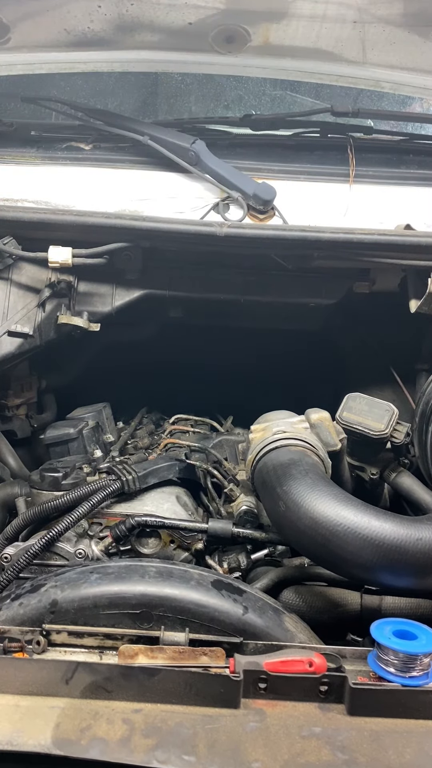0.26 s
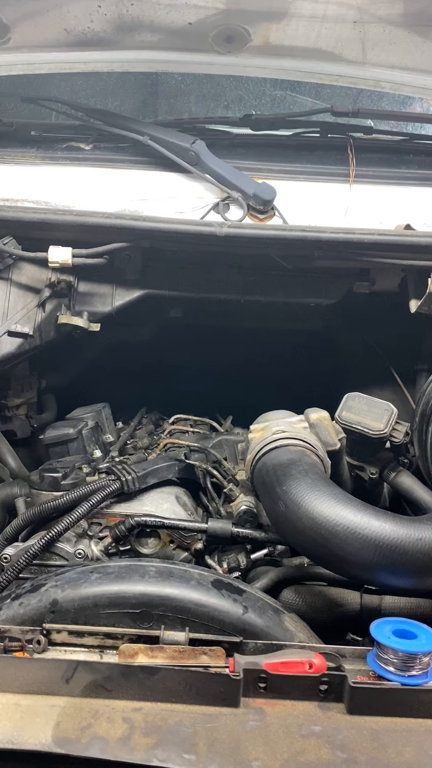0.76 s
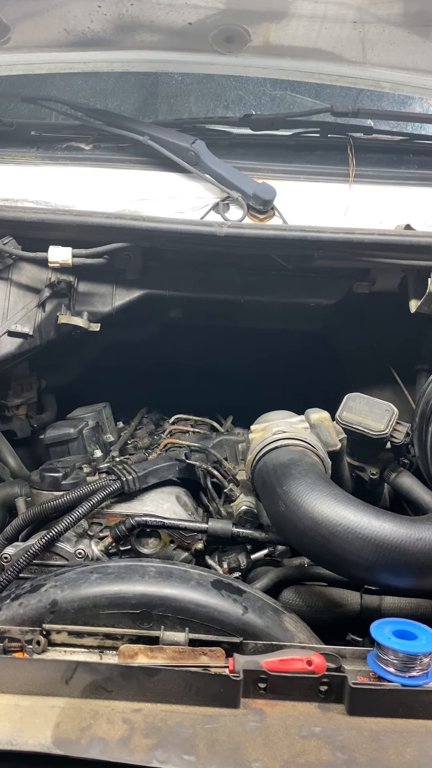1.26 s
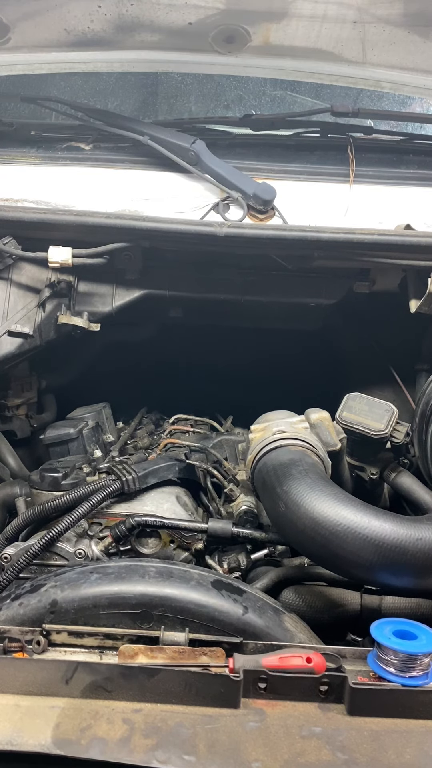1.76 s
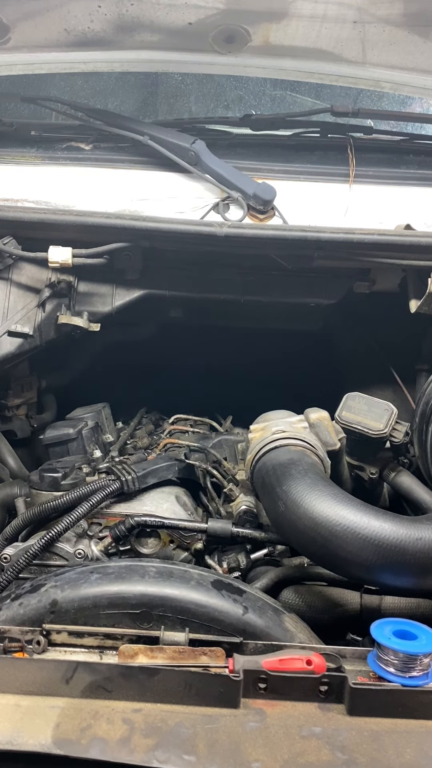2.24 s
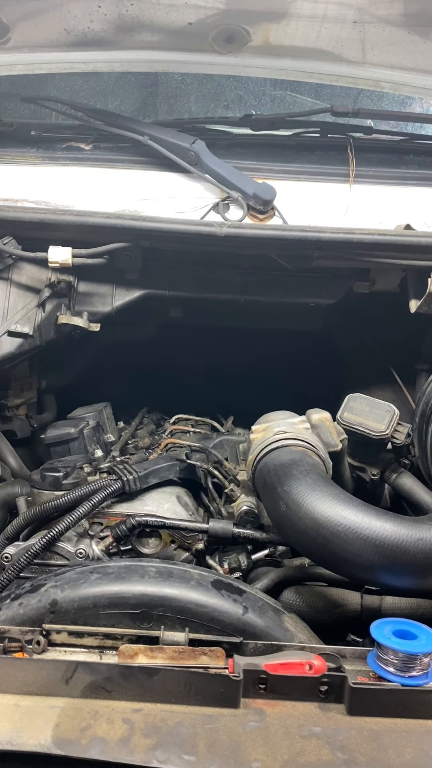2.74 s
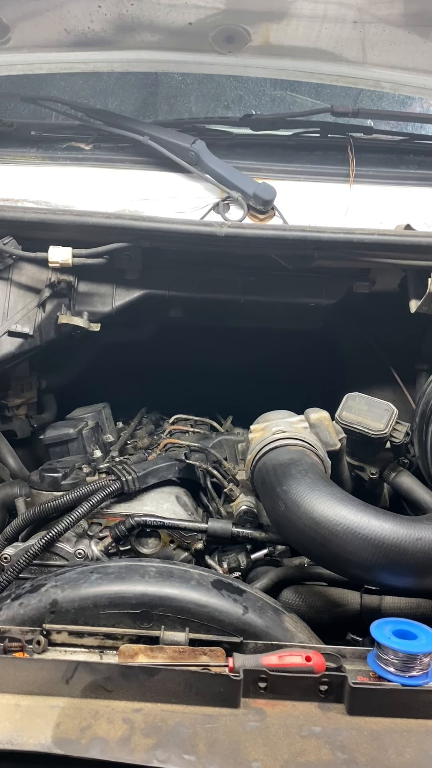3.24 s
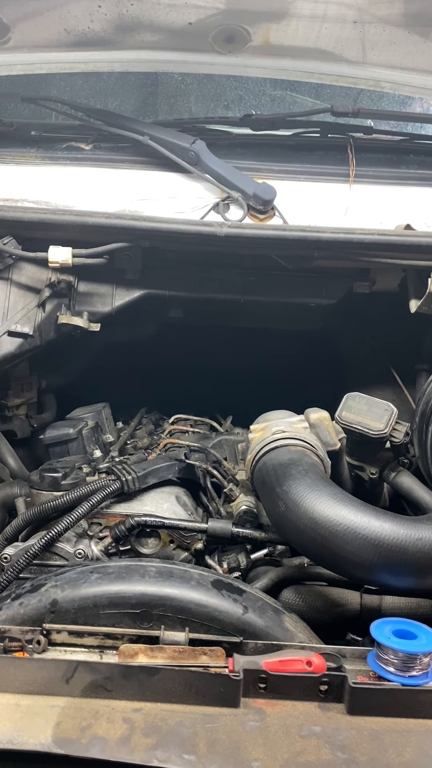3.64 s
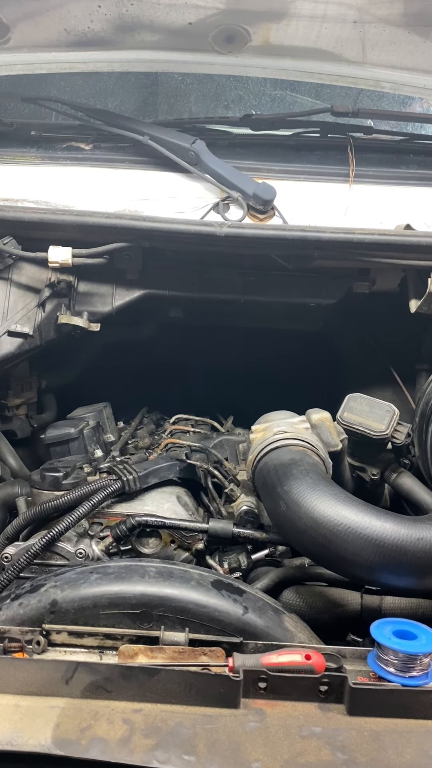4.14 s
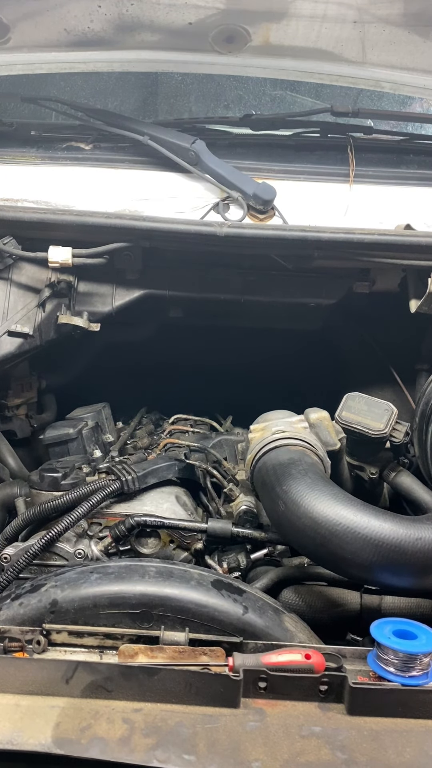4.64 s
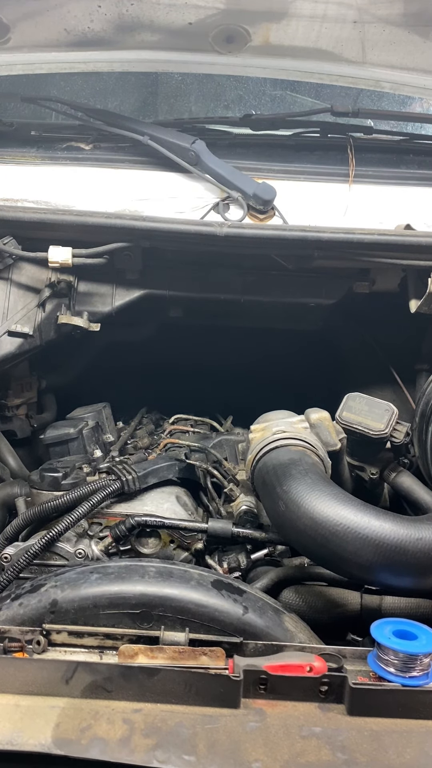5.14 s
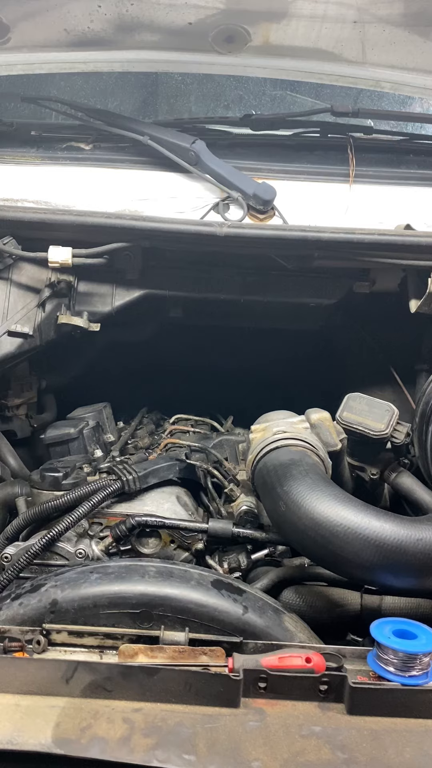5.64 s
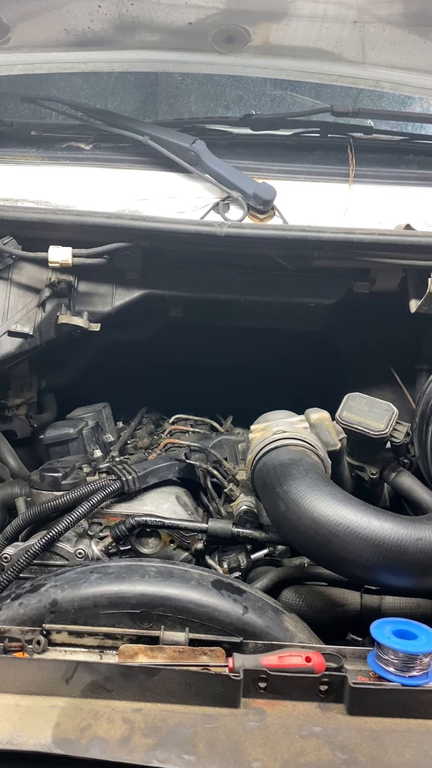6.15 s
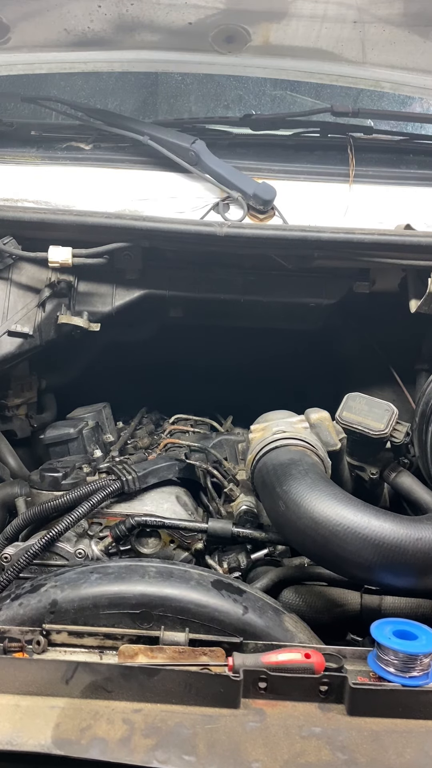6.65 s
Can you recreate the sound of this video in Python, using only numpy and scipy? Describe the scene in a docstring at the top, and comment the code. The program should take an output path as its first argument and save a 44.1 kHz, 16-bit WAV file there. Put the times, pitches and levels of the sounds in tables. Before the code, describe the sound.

A starter motor cranks a diesel van engine, heard close up under the open bonnet. It whirrs from the outset in a rapid, even pulsing, its pitch dipping with each pulse as the gears howl, rattle and scrape. Sharp knocks, soft thuds of air and brief squeals repeat in a steady pattern. Midway, something loose ticks faintly three times. The cranking carries on throughout and the engine never fires.

```python
"""A starter motor cranks a five-cylinder diesel under an open bonnet. It whirrs from the outset.
In each cycle it grips the first three cylinders' squeezes of air sharply, with a knock. Every squeeze
drags it down: its loaded gears howl, rattle and scrape, the flywheel rings and the mounting groans.
Then the crank runs ahead and air thuds at the valves. The last two squeezes, gripped softly, squeal.
This cycle keeps repeating. Later something loose ticks three times, and the engine never fires."""
import sys
import numpy as np
from scipy import signal
from scipy.fft import rfft, irfft, next_fast_len
from scipy.io import wavfile
from scipy.ndimage import map_coordinates

SR = 44100
rng = np.random.default_rng(int(sys.argv[2]) if len(sys.argv) > 2 else 0)


def generate_wav(sig):
    """Save sig (samples, or channels by samples) to the path in sys.argv[1] as 16-bit PCM at SR."""
    pcm = np.round(np.clip(np.atleast_2d(sig).T, -1, 1) * 32767).astype(np.int16)
    wavfile.write(sys.argv[1], SR, pcm)


N = 304290
TIME = np.arange(N) / SR
# one engine cycle is two turns of the crank; each takes a little longer as the battery tires
FIRST_CYCLE_S, CYCLE_S, TIRING_S = -.1622, .6905, .00038
CYCLE_STARTS = FIRST_CYCLE_S + CYCLE_S * np.arange(11) + TIRING_S * np.arange(11) ** 2


def amp(db):
    """Turns decibels into a plain multiplier."""
    return 10 ** (np.asarray(db) / 20)


def unit(x):
    """Scales a signal to an average (rms) strength of 1."""
    return x / np.sqrt(np.mean(x ** 2) + 1e-20)


def along(points, hz):
    """Reads a curve drawn through (frequency, level) points on a log frequency axis."""
    freqs, levels = np.transpose(points)
    return np.interp(np.log(hz + 1), np.log(freqs + 1), levels)


def wobble(rate):
    """A smooth random curve through `rate` points a second."""
    return unit(map_coordinates(rng.standard_normal(int(N * rate / SR) + 4), [TIME * rate]))


def coloured(x, level_db):
    """Filters x, turning each frequency up or down by level_db(hz)."""
    size = 2 * next_fast_len(N // 2 + 8192)
    cepstrum = irfft(np.log(amp(level_db(np.fft.rfftfreq(size, 1 / SR)))), size)
    # folding makes the filter ring only after a sound, never before it
    cepstrum[1:size // 2] *= 2
    cepstrum[size // 2 + 1:] = 0
    return irfft(rfft(x, size) * np.exp(rfft(cepstrum)), size)[:N]


def each_cycle(rows):
    """Repeats rows in every engine cycle; their first column, t, counts from the cycle's start."""
    return [(start + s, *rest) for start in CYCLE_STARTS for s, *rest in rows]


def tone(teeth, multiple, rough):
    """A note at a multiple of the tooth rate; uneven teeth shake its strength and timing."""
    strength = np.sqrt(2) * (1 + rough * wobble(170))
    return strength * np.sin(2 * np.pi * multiple * teeth + rough * wobble(130))


# the notes at which the metal casing rings: f/Hz, width/Hz, boost/dB
CASING_NOTES = [(390, 29, 4.5), (537, 25, 2.8), (700, 83, 2.9), (813, 30, 3), (976, 46, 5.1),
                (1077, 23, 5.4), (1250, 36, 11.37), (1367, 32, 3.7), (1470, 30, 5.5), (1700, 33, 3.6),
                (1826, 54, 3), (2067, 46, 8.3), (2127, 32, 5.9), (2330, 120, 2.3), (2604, 86, 2.5),
                (2850, 21, 2.5), (3173, 77, 4.3), (3770, 37, 3.4), (4030, 24, 2.8), (4180, 40, 3),
                (4800, 30, 2), (5390, 90, 6.9), (5520, 35, 2.6), (6000, 35, 2.5), (6330, 150, 3.2),
                (9150, 130, 3.6), (12100, 200, 3)]
def ringing_db(hz):
    """The casing boosts sound close to its own notes."""
    peaks = sum((amp(db) ** 2 - 1) / (1 + (2 * (hz - centre) / width) ** 2)
                for centre, width, db in CASING_NOTES)
    return 10 * np.log10(np.maximum(1 + peaks, .1))


# the broad tone colour of the starter and the housing around the flywheel: f/Hz, level/dB
CASING_COLOUR = [(30, -24), (200, -15), (310, -2), (430, -5), (490, 3.5), (650, 1), (900, -5.5), (1000, -2),
                 (1400, .5), (1590, -3), (2700, -2.5), (4400, -9.5), (5600, -10.5), (7400, -25),
                 (15500, -40.5)]
def casing_db(hz):
    """How well the casing passes each frequency: narrow peaks on a broad slope."""
    return along(CASING_COLOUR, hz) + ringing_db(hz)


# the noise of brushes, belts and bearings: f/Hz, relative level/dB
WHIRR_COLOUR = [(25, -14), (35, -3), (48, -12), (65, -4), (110, -2.5), (165, 2.5), (215, -6.5), (340, 6),
                (480, 1), (900, -11), (2000, -5), (3500, -2), (5400, -0.5), (7200, -10.5), (8500, -10.5),
                (12500, -18.5), (15500, -27)]
def whirr(teeth):
    """Running noise keeps the casing faintly ringing; the motor's contacts whistle over a low hum."""
    noise = rng.standard_normal(N)
    hiss = unit(coloured(noise, lambda hz: along(WHIRR_COLOUR, hz) + .48 * ringing_db(hz)))
    hum = amp(-62.5 + 2 * wobble(4.97)) * np.sin(2 * np.pi * 111 * TIME + .3 * wobble(4))
    hiss *= amp(-43.5 + .59 * wobble(25))
    whistle = amp(-64.5) * tone(teeth, 20, rough=.6)
    return hiss + whistle + hum


# each cylinder's squeeze of air: starter grips t/s, grip rise/s, grip to peak strain/s, peak load/dB,
# tooth rate before f/Hz, tooth rate at its slowest f/Hz, relative groan level/dB
SQUEEZES = [(.006, .013, .074, -29, 438, 347, 0), (.156, .011, .058, -27.5, 443.3, 350.1, 2.5),
            (.293, 0.0094, .059, -29, 437.1, 372.1, 1), (.378, 0.037, .112, -29.2, 427.7, 372.1, -.5),
            (.500, 0.071, .130, -30, 425, 346.5, -2)]
def tooth_rate(slowing_s=.074, lag_s=.011):
    """Gear teeth meeting per second: each squeeze drags the starter down, then it recovers."""
    corners = []
    for grip, _, peak, _, fast_hz, slow_hz, _ in each_cycle(SQUEEZES):
        slowest = grip + peak + lag_s
        corners += [(slowest - slowing_s, fast_hz), (slowest, slow_hz)]
    times, hz = np.transpose(corners)
    steps = np.arange(len(corners))
    part, whole = np.modf(np.interp(TIME, times, steps))
    eased = whole + np.sin(np.pi / 2 * part) ** 2
    return np.interp(eased, steps, hz)


def gear_load(slack_db=-41.0, build_db_per_s=35, hold_s=.0085, release_s=.023):
    """Load in dB: the starter grips, pushes ever harder, then goes slack as the crank runs ahead."""
    load_db = np.full(N, slack_db)
    for grip, attack, peak, db, *_ in each_cycle(SQUEEZES):
        near = slice(*np.searchsorted(TIME, [grip, grip + CYCLE_S / 2]))
        t = TIME[near] - grip
        push_db = db - slack_db - build_db_per_s * np.maximum(peak - t, 0)
        engaged = np.minimum(t / attack, 1) * np.exp(-np.maximum(t - peak - hold_s, 0) / release_s)
        load_db[near] = np.maximum(load_db[near], slack_db + engaged * push_db)
    return load_db


def turning_noise(repeat_share):
    """White noise, part of which comes back each cycle as the same teeth meet."""
    since = TIME - CYCLE_STARTS[np.maximum(np.searchsorted(CYCLE_STARTS, TIME) - 1, 0)]
    worn, fresh = rng.standard_normal((2, N))
    repeated = worn[(since * SR + .25).astype(int)]
    return np.sqrt(repeat_share) * repeated + np.sqrt(1 - repeat_share) * fresh


def rattle(teeth, scatter_db, fade, rub):
    """Each tooth lands with a short burst of its own strength, over steady rubbing."""
    sizes = amp(scatter_db * rng.standard_normal(int(teeth[-1]) + 1))
    bursts = unit(sizes[teeth.astype(int)] * np.exp(-fade * (teeth % 1)))
    return unit((bursts + rub) * turning_noise(repeat_share=.23))


# two surges on each of the two softly gripped squeezes: t/s, half length/s, strength
SQUEAL_SURGES = [(.419, .009, 5.5), (.448, .009, 10), (.535, .010, 10.5), (.571, .015, 10)]
def singing(steady_db=-19.08, db_per_strength=1.27):
    """Level in dB of the note at three times the tooth rate: it always sings, and swells to squeals."""
    swells = np.zeros(N)
    for s, width, strength in each_cycle(SQUEAL_SURGES):
        near = np.abs(TIME - s) < CYCLE_S / 2
        swells[near] += strength * np.exp(-((TIME[near] - s) / width) ** 2 / 2)
    return steady_db + db_per_strength * (.95 * wobble(12) + swells)


# the howl of the teeth: multiple of the tooth rate, relative level/dB
HOWL_NOTES = [(1, -17.5), (2, -14.5), (4, -21), (5, -21.5)]
# the whine of the motor's spinning core: multiple of the tooth rate, relative level/dB
WHINE_NOTES = [(7.5, -14), (15, -20)]
# slack teeth fall quiet, hard-pressed ones level off: load/dB, level/dB
LOAD_TO_LEVEL = [(-41.5, -42.5), (-36.5, -35), (-32, -29.5), (-26.5, -26)]
def gears(teeth, load_db, sing_db):
    """Howl, whine and rattle all grow with the load and sound through the casing."""
    pressed = amp(.3 * (load_db + 30))  # slack teeth hardly howl
    howl = pressed * sum(amp(db) * tone(teeth, k, rough=.4) for k, db in HOWL_NOTES)
    sing = pressed * amp(sing_db) * tone(teeth, 3, rough=.34)
    whine = sum(amp(db) * tone(teeth, k, rough=.36) for k, db in WHINE_NOTES)
    clatter = amp(4) * rattle(teeth, scatter_db=1.5, fade=1.56, rub=1.2)
    force = amp(np.interp(load_db, *np.transpose(LOAD_TO_LEVEL)) + .5 * wobble(14))
    return coloured(force * (howl + sing + whine + clatter), casing_db)


# the noise of sliding teeth: f/Hz, relative level/dB
SCRAPE_COLOUR = [(1500, -20.5), (3500, -2), (5500, 0.5), (7400, -11), (12000, -15), (15500, -20.5)]
def scrape(teeth, load_db, grip_db, level_db):
    """The teeth scrape brightly whenever the starter is driving, however hard it pushes."""
    driving = 1 / (1 + np.exp((grip_db - load_db) / 1.2))
    sliding = rattle(teeth, scatter_db=3.5, fade=2, rub=.8)
    bright = coloured(sliding, lambda hz: along(SCRAPE_COLOUR, hz) + ringing_db(hz))
    return amp(level_db + wobble(20)) * driving * unit(bright)


# the flywheel's notes: f/Hz, time to fade by 60 dB (t60)/s, relative level/dB
FLYWHEEL_NOTES = [(1244, .14, 0), (2068, .16, -2.5), (2135, .1, -4), (9140, .04, -16)]
def flywheel(load_db, level_db, swing_db):
    """The loaded teeth keep striking the flywheel, which rings on between squeezes."""
    blows = unit(amp(load_db + swing_db * wobble(9))) * rng.standard_normal(N)
    t = np.arange(SR // 2) / SR
    rings = sum(amp(db - 60 * t / t60) / np.sqrt(t60) * np.sin(2 * np.pi * hz * t)
                for hz, t60, db in FLYWHEEL_NOTES)
    return amp(level_db) * unit(signal.fftconvolve(blows, rings)[:N])


def groan(hz, sag_hz_per_s, level_db, half_length_s=.022):
    """At each peak of strain the mounting groans, its pitch sagging as the crank slows."""
    out = np.zeros(N)
    for grip, _, peak, *_, db in each_cycle(SQUEEZES):
        size, detune, phase = rng.standard_normal(3)
        near = np.abs(TIME - (grip + peak)) < 3 * half_length_s
        t = TIME[near] - (grip + peak)
        turns = (hz + 3 * detune) * t - sag_hz_per_s * t ** 2 / 2 + phase
        swell = amp(level_db + db + size) * np.exp(-(t / half_length_s) ** 2 / 2)
        out[near] += swell * np.sin(2 * np.pi * turns)
    return out * (1 + .28 * wobble(130))


# gulps of air at the valves: t/s, f/Hz, relative level/dB
AIR_GULPS = [(.132, 120, 1), (.151, 142, -2.5), (.268, 127, -2.5), (.288, 141, -7), (.396, 119, -12),
             (.541, 114, -1.5), (.686, 115, 0)]
def gulps(level_db, half_length_s, pipe_hz, pipe_db, pipe_t60):
    """Each gulp of air is a low thud of about two swings; the intake pipe hums on."""
    out = np.zeros(N)
    for s, hz, db in each_cycle(AIR_GULPS):
        near = np.abs(TIME - s) < .3
        t = TIME[near] - s
        thud = np.exp(-(t / half_length_s) ** 2) * np.cos(2 * np.pi * hz * t)
        pipe = (t > 0) * amp(pipe_db - 60 * np.abs(t) / pipe_t60) * np.sin(2 * np.pi * pipe_hz * t)
        out[near] += amp(level_db + db) * (thud + pipe)
    return out


# knocks as the starter grips sharply at the start of each cycle's first three squeezes:
# t/s, lower ring's relative level/dB, upper ring's relative level/dB
DRIVE_KNOCKS = [(.012, -1.5, -2), (.162, 2, -2.5), (.299, -1, 3)]
def knocks(lower_hz, upper_hz, ring_db, t60, crack_db, crack_t60):
    """The drive catches the slowing crank: a crack, and two beating rings of the starter's nose."""
    out, t = np.zeros(N), np.arange(SR // 5) / SR
    for s, lower_db, upper_db in each_cycle(DRIVE_KNOCKS):
        if s > 0:
            lower_change, upper_change, size = rng.standard_normal(3)
            lower = amp(lower_db + 2 * lower_change) * np.sin(2 * np.pi * lower_hz * t)
            upper = amp(upper_db + 2 * upper_change) * np.sin(2 * np.pi * upper_hz * t)
            ring = amp(ring_db - 60 * t / t60) * (1 - np.exp(-t / .01)) * (lower + upper)
            crack_shape = amp(crack_db + size - 60 * t / crack_t60) * (1 - np.exp(-t / .003))
            crack = crack_shape * rng.standard_normal(len(t))
            spot = out[round(s * SR):][:len(t)]
            spot += (ring + crack)[:len(spot)]
    return coloured(out, lambda hz: casing_db(hz) + along([(3000, -1), (6000, 0), (11000, 12)], hz))


# ticks of loose metal, timed from the start of the scene: t/s, relative level/dB
LOOSE_TICKS = [(2.6848, -25), (3.6002, -32), (4.0093, -33)]
def ticks(ring_hz, width_hz, t60, level_db):
    """Something loose ticks now and then: short bursts of noise around one high note."""
    blows = sum(amp(db + level_db - 60 * np.abs(TIME - s) / t60) * (TIME >= s) for s, db in LOOSE_TICKS)
    bursts = blows * rng.standard_normal(N)
    return coloured(bursts, lambda hz: -10 * np.log10(1 + ((hz - ring_hz) / width_hz) ** 2))


def engine_bay(x, t60, echo_db):
    """Close metal walls add a short, dense echo."""
    t = np.arange(SR // 8) / SR
    tail = rng.standard_normal(len(t)) * amp(-60 * t / t60) * (t > .002)
    echo = signal.fftconvolve(x, tail / np.linalg.norm(tail))[:N]
    return x + amp(echo_db) * coloured(echo, lambda hz: along([(400, -15), (1400, -5), (2500, 1)], hz))


# how much louder the left side is than the right: f/Hz, level/dB
LEFT_OVER_RIGHT = [(450, 0), (740, -1), (1220, -2.5), (2010, -1), (3330, 0.8), (5500, 0)]
# stray sound, added on the left and taken away on the right: f/Hz, level/dB
STRAY_COLOUR = [(30, -27), (60, -26), (130, -21), (250, -17), (350, -13.5), (600, -18.5), (1200, -14),
                (2400, -14.5), (3000, -12.5), (3800, -45), (7000, -44), (12000, -55)]
def stereo(direct, stray):
    """Left and right hear nearly the same; stray sound from around the bay sets them slightly apart."""
    side = coloured(stray, lambda hz: along(STRAY_COLOUR, hz))
    return np.array([coloured(direct, lambda hz: sign * along(LEFT_OVER_RIGHT, hz) / 2) + sign * side
                     for sign in (1, -1)])


def scene():
    """Starter, flywheel and gulping air in the engine bay, in stereo."""
    tooth_hz, load_db, sing_db = tooth_rate(), gear_load(), singing()
    teeth = np.cumsum(tooth_hz * (1 + .005 * wobble(6))) / SR  # running count of teeth that have met
    metal = whirr(teeth) + gears(teeth, load_db, sing_db)
    metal += scrape(teeth, load_db, grip_db=-34, level_db=-45)
    metal += flywheel(load_db, level_db=-44.5, swing_db=1.5)
    low = groan(hz=390.7, sag_hz_per_s=460, level_db=-33)
    low += gulps(level_db=-40.5, half_length_s=.0081, pipe_hz=161.8, pipe_db=-11, pipe_t60=.27)
    metal += knocks(lower_hz=476.2, upper_hz=540.7, ring_db=-32, t60=.24, crack_db=-24.5, crack_t60=.14)
    metal += ticks(ring_hz=4398, width_hz=269, t60=.063, level_db=7.5)
    stray = gears(teeth + .248 * wobble(3), load_db, sing_db) + whirr(teeth)
    return stereo(engine_bay(metal, t60=.069, echo_db=-11) + low, stray)


def record(dry, top_hz=15700):
    """Cuts away the very highest treble."""
    size = next_fast_len(N + 8192)
    kept = np.fft.rfftfreq(size, 1 / SR) < top_hz
    return irfft(rfft(dry, size) * kept, size)[:, :N]


dry = scene()
out = record(dry)
generate_wav(out)
```